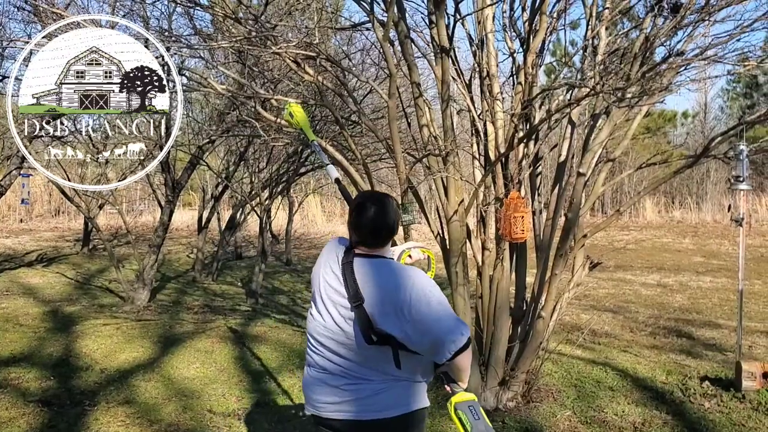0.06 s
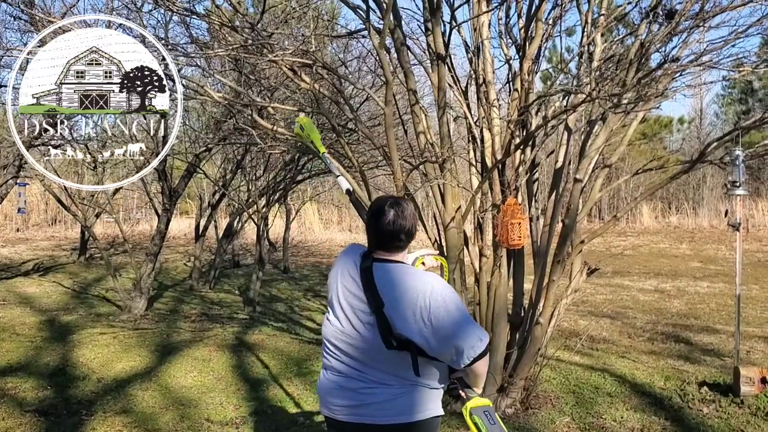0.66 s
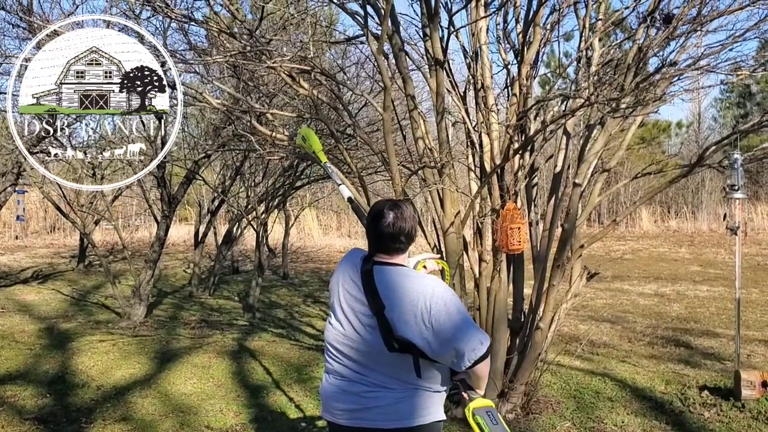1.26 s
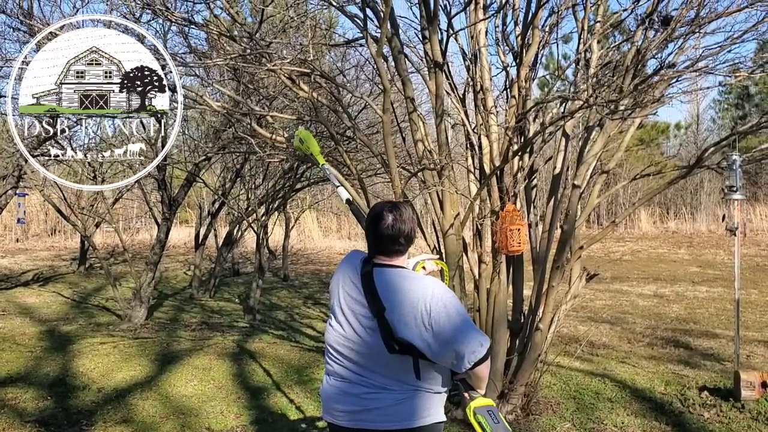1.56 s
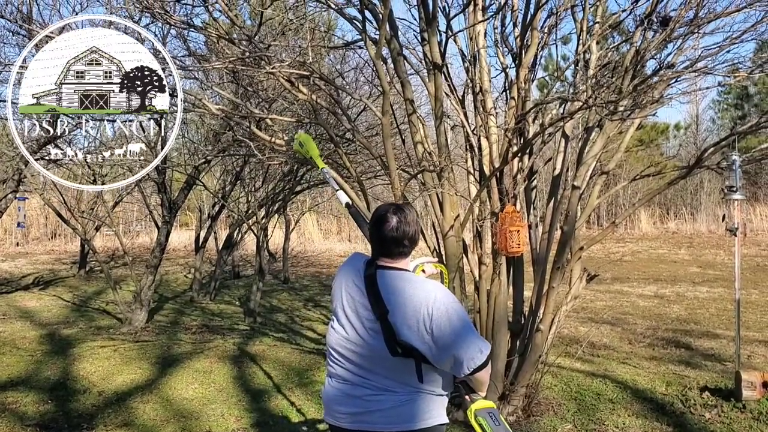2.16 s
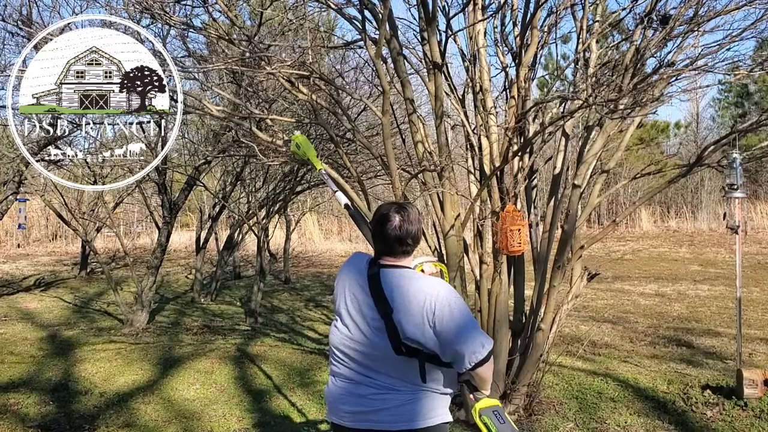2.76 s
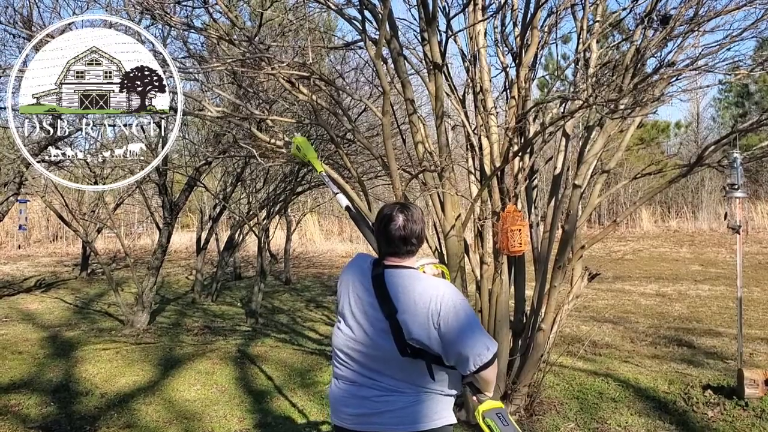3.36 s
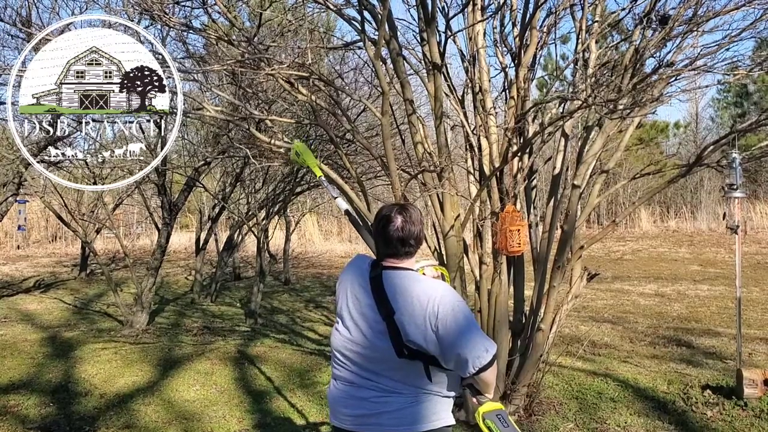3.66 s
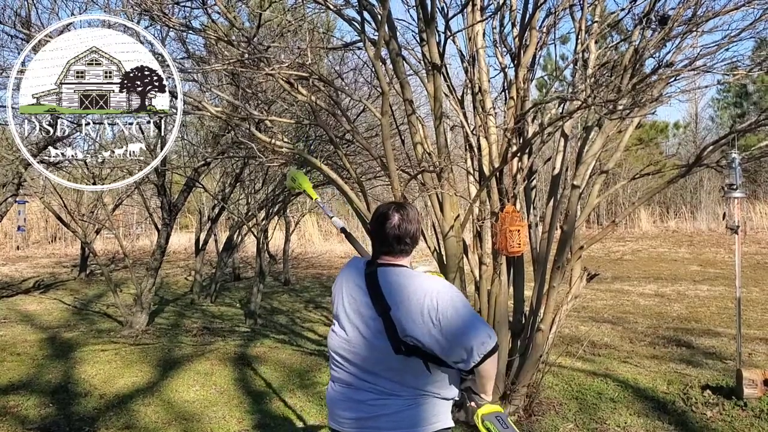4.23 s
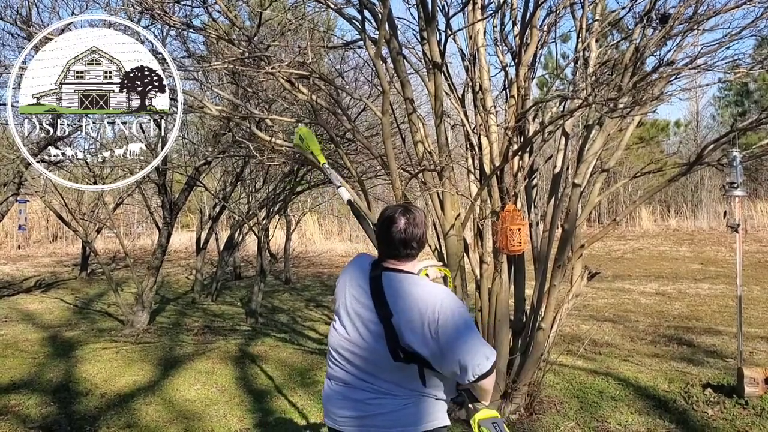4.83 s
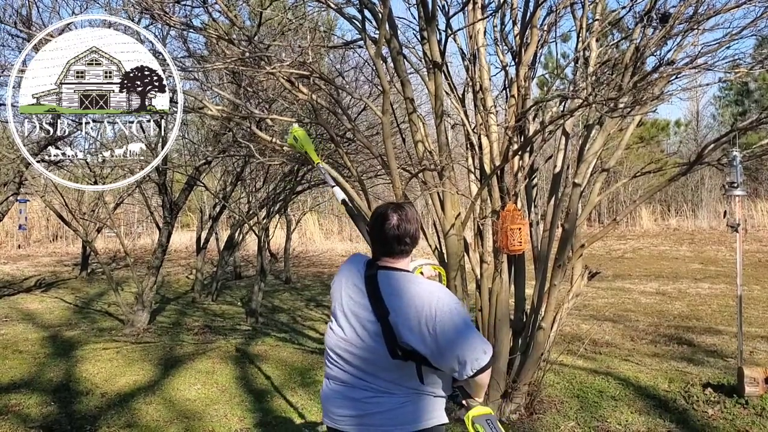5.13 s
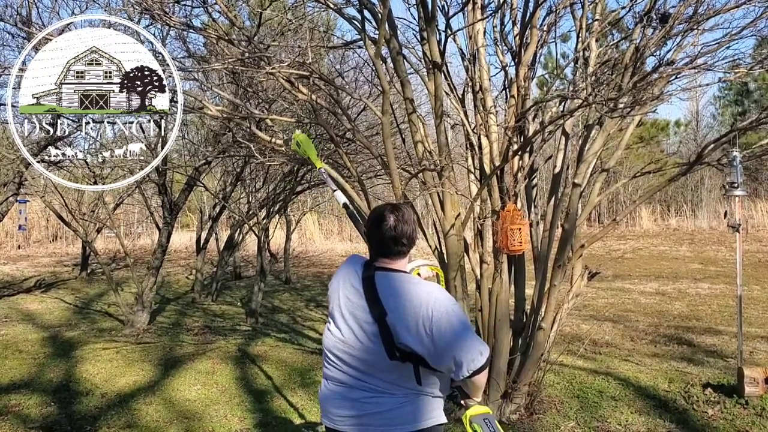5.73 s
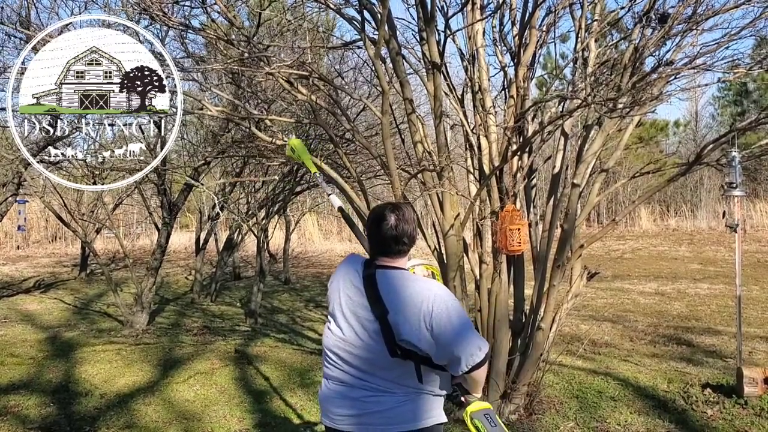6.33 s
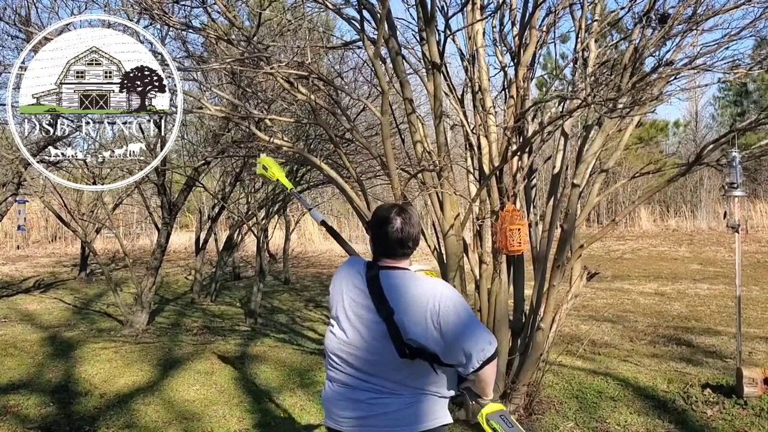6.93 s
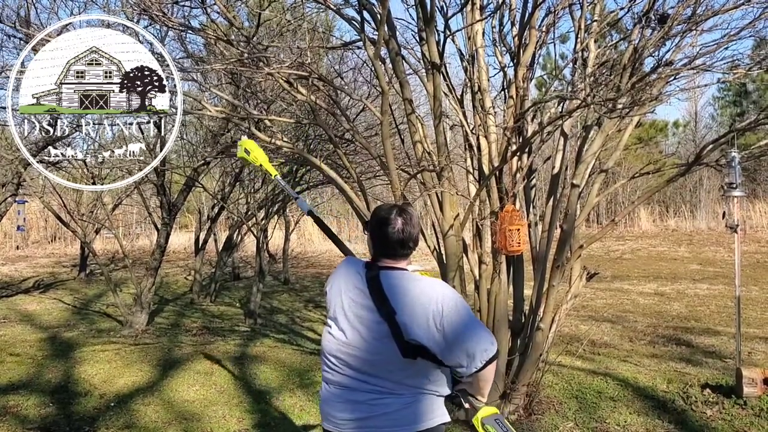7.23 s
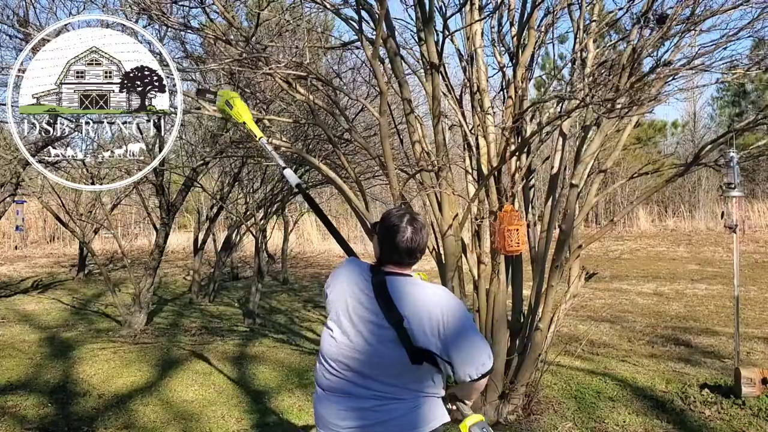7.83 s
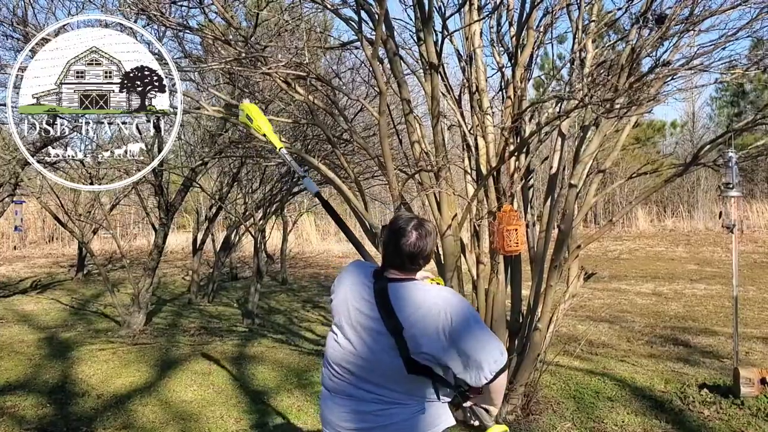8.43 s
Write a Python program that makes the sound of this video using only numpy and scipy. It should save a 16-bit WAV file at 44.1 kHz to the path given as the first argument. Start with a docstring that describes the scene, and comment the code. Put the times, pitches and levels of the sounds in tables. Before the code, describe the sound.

A battery pole saw is already running a few metres away in a garden, with a high gear whine and a rattling, hissing chain. From about 2.3 to 3.7 seconds the teeth grind harder into a branch and the pitch sags, with several wood cracks between 2.4 and 2.9 seconds. Near 4 seconds the motor starts to coast, then spins up again at 4.7. It bites again around 5.8, and the wood snaps sharply at about 6.2 seconds. From 6.5 the saw winds down, its whine falling and its rattle slowing and fading. A cut twig knocks as it drops at 6.8, followed by lighter ticks until about 8 seconds. Low puffs of wind buffet the microphone on either side throughout. A distant engine drones faintly, swelling around 5.5 seconds, and a few very faint bird calls come from 7.6 seconds on.

```python
"""In a garden, a few metres away, a battery pole saw cuts twigs: a long burst, a shorter one, a coast.
Its gear whines and drops in pitch as the wood slows the motor. The chain rattles round its metal bar,
the teeth grind, the wood cracks and a cut twig drops. Wind buffets the two microphone openings,
while far off an engine drones and birds call."""
import sys
import numpy as np
from scipy import signal
from scipy.fft import rfft, irfft, next_fast_len
from scipy.io import wavfile
from scipy.ndimage import uniform_filter1d

SR = 44100
rng = np.random.default_rng(int(sys.argv[2]) if len(sys.argv) > 2 else 0)


def dump_mix(stems):
    """Bounce the given channels to the path in sys.argv[1] as a 16-bit WAV at rate SR."""
    frames = np.atleast_2d(stems).T  # one column per channel
    limited = np.clip(frames, -1, 1)  # hard clip at full scale
    pcm = np.round(limited * 32767).astype(np.int16)
    wavfile.write(sys.argv[1], SR, pcm)


N = 374409
T = np.arange(N) / SR

# The garden's far rumble and rustle: frequency_hz, relative_db
GARDEN_SPECTRUM = [(30, -7.5), (70, 9), (150, -10.5), (400, -24), (850, -23), (1400, -23), (2200, -31.5),
                   (4500, -36), (9000, -43.5), (16000, -50)]
# How loud the far engine is: time_s, level_db
ENGINE_LEVELS = [(0, -68), (4.5, -55.5), (5.4, -40), (6.05, -43.5), (6.5, -52), (8.49, -53.5)]
# How loud the low hum is: time_s, level_db
HUM_LEVELS = [(0, -58), (.5, -44.5), (1.2, -61), (4.4, -57), (5.2, -58), (8.49, -61)]
# Bird calls: start_s, length_s, first_hz, last_hz, level_db, rasp_cycles
BIRD_CALLS = [(7.595, .085, 4700, 3450, -65, .08), (8.26, .17, 2300, 2150, -66, .3),
              (8.425, .08, 4900, 3100, -72, .05)]
# The steady breeze on the microphone: time_s, level_db
BREEZE_LEVELS = [(0, -53), (1.3, -38), (1.6, -62), (4.1, -72), (4.7, -52), (8.49, -36)]
# Puffs of wind: peak_s, half_length_s, relative_db, side_hit
WIND_GUSTS = [(0.214, 0.018, -25, "left"), (0.366, .081, -34, "left"), (0.938, 0.062, -24.5, "right"),
              (1.17, 0.07, -28.5, "right"), (1.367, 0.042, -38, "left"), (2.179, 0.026, -30, "right"),
              (3.863, .03, -32, "right"), (4.393, 0.024, -25, "left"), (4.69, 0.23, -31.5, "left"),
              (5.254, 0.11, -28.5, "left"), (5.46, 0.056, -28, "left"), (6.68, 0.071, -31.5, "right"),
              (7.3, 0.032, -28, "right"), (7.813, 0.064, -33, "left"), (7.997, 0.17, -32.5, "right"),
              (8.262, 0.014, -22, "left")]
# The deep rumble of wind: frequency_hz, relative_db
WIND_SPECTRUM = [(15, -23), (35, -6.5), (65, 4.5), (100, -4), (150, -15), (250, -32), (500, -45),
                 (1500, -82.5)]
# Wood snaps and twig knocks: peak_s, level_db, swell_s, fade_60db_s, tilt_db_per_octave, speed_lost_hz
WOOD_CRACKS = [(2.426, -21.5, .014, .06, -3, 26), (2.488, -25, .003, .06, -3, 11.6),
               (2.561, -21, .007, .09, -2, 24.8), (2.859, -23, .003, .21, 3, 14.5),
               (5.854, -27, .004, .08, -1, 11.9), (6.149, -12.5, .0005, .07, 1.2, 26.8),
               (6.229, -16.5, .004, .062, -1, 23), (6.778, -20.5, .0055, .05, 1.5, 0),
               (6.791, -25, .002, .08, 2.5, 0), (7.374, -35.5, .0005, .05, -1.5, 0),
               (7.785, -34.5, .003, .045, 1.5, 0), (7.945, -56, .0045, .2, -6, 0),
               (8.035, -53, .014, .14, -5.5, 0)]
# Tearing wood fibres: frequency_hz, relative_db
FIBRE_SPECTRUM = [(80, -24.5), (220, -1), (3000, 3), (7000, -0.5), (10000, -4.5), (16000, -8.5)]
# Teeth grinding a branch: frequency_hz, relative_db
GRIND_SPECTRUM = [(60, -43), (140, -14), (220, 7.5), (330, -4.5), (500, 0.5), (900, -7), (2000, -15.5),
                  (6000, -34)]
# When the trigger is held: start_s, end_s
TRIGGER_HELD = [(-1, 3.94), (4.667, 6.501)]
# What slows the motor: at first a light drag that eases off as the motor runs in, then the bar pressing into
# branches: start_s, length_s, first_drag_hz, last_drag_hz
MOTOR_DRAGS = [(-0.009, 1.54, 3.0, 0.59), (1.567, 0.65, 3.8, 5.12), (2.25, 0.35, 16.4, 23.9),
               (2.611, 0.29, 11.3, 10.5), (2.858, 0.179, 28.6, 22.2), (3.053, 0.498, 14.0, 8.6),
               (3.557, 0.244, 16.5, 0.4), (5.749, 0.23, 2.4, 9.1), (6.011, 0.23, 20.1, 23.7)]
# Tones of the sprocket, the wheel that drives the chain: cycles_per_turn, relative_db
SPROCKET_TONES = [(2, -9.5), (4, 1), (6, -4), (8, -20.5), (10, 1), (11, -1.5), (14, -17.5)]
# The sprocket's low tones as the chain tightens and slackens: time_s, relative_db
CHAIN_PULL = [(0.05, -48), (1.46, -46.5), (2.02, -38.5), (3.09, -48), (3.3, -29.5), (3.49, -44.5),
              (3.58, -37), (3.95, -50.5), (4.95, -51), (5.022, -44), (6.5, -48.5)]
# Chain links slapping: frequency_hz, relative_db
RATTLE_SPECTRUM = [(150, -30.5), (380, -21), (650, -11), (950, 1), (1400, -2), (2100, -0.5), (2750, -7),
                   (3300, -3), (3900, -5), (4800, -4), (6000, -11.5), (9000, -31.5)]
# Chain links sliding: frequency_hz, relative_db
HISS_SPECTRUM = [(1500, -6.5), (3500, -1), (5200, 0), (6900, 4), (7500, 0), (9000, 0), (10200, -3),
                 (12000, -1.5), (15500, -1.5)]
# Pitches at which the bar and housing ring: pitch_hz, width_hz, relative_db
BAR_RINGS = [(532, 55, 6.5), (1350, 45, 4.5), (1485, 32, 5.5), (1810, 37, -2), (1034, 62, -12),
             (2650, 55, -0.5), (2987, 56, 2), (3425, 170, -1.5), (3768, 72, 3), (4280, 68, -2)]
# The motor's weaker tones: cycles_per_turn, relative_db
MOTOR_TONES = [(4.41, -22), (5.25, -14.5), (7, -29.5), (10, -15), (15, -28)]
# The gear whine as the saw head is turned about: time_s, relative_db, left_minus_right_db
WHINE_LEVELS = [(0.0, -24.5, 19.5), (0.14, -31.5, 2.5), (0.41, -33.5, 15), (0.49, -40, -6),
                (0.77, -25, 1.0), (0.98, -27.5, -6.5), (1.17, -24.5, 3.5), (1.75, -28, 10.5),
                (1.96, -35.5, 11.5), (3.31, -28, 4.5), (3.51, -27, 16), (3.95, -26.5, 7), (4.87, -30.5, 4),
                (5.328, -40, -7), (5.514, -26.5, 2), (5.764, -25, 13.0), (5.846, -32, 5),
                (6.436, -30.5, 3.5), (6.5, -27.5, 8)]

GEAR_TEETH, WHEEL_TEETH, SPROCKET_TEETH = 14, 33, 6
FULL_SPEED_HZ = 327.3  # motor turns per second with nothing to cut


def undb(db):
    """Turn decibels into a number to multiply by."""
    return 10 ** (np.asarray(db) / 20)


def unit(x):
    """Scale a sound to an average power of 1."""
    return x / np.sqrt(np.mean(x ** 2))


def curves(table):
    """Join a table's points with straight lines in time, one curve per column."""
    times, *columns = np.transpose(table)
    return [np.interp(T, times, column) for column in columns]


def colour(x, spectrum, rings=()):
    """Shape a sound's bass and treble, add ringing peaks and scale it to power 1."""
    size = next_fast_len(N, True)
    bins_hz = np.fft.rfftfreq(size, 1 / SR) + 1
    hz, db = np.transpose(spectrum)
    shape = undb(np.interp(np.log(bins_hz), np.log(hz), db))
    peaks = 1 + sum(undb(peak) / (1 + 2j * (bins_hz - pitch) / width) for pitch, width, peak in rings)
    return unit(irfft(rfft(x, size) * peaks * shape, size)[..., :N])


def wander(rate_hz):
    """A smooth random wobble, mostly between -1 and 1."""
    step = max(int(SR / rate_hz), 1)
    points = rng.standard_normal(N // step + 2)
    joined = np.interp(np.arange(N) / step, np.arange(len(points)), points)
    return 1.45 * uniform_filter1d(joined, step // 2 + 1)


def air_noise(alike_hz):
    """Left and right noise, alike below alike_hz and unrelated above."""
    mid, side = rng.standard_normal((2, N))
    side = signal.sosfilt(signal.butter(3, alike_hz, "high", fs=SR, output="sos"), side)
    return np.array([mid + 1.17 * side, mid - 0.86 * side])


def pan(left_db):
    """Left and right gains that make the left louder by left_db."""
    gains = undb(np.array([[1], [-1]]) * left_db / 2)
    return gains / np.sqrt(np.mean(gains ** 2, axis=0))


def tone(cycles):
    """A pure tone of power 1, from a running count of cycles."""
    return np.sqrt(2) * np.sin(2 * np.pi * cycles)


def shade(x, left_db):
    """The phone's body shields one microphone opening from the treble."""
    low = signal.sosfiltfilt(signal.butter(2, 1000, fs=SR, output="sos"), x)
    return low + (x - low) * pan(left_db)


def far_background(garden_db=-51, engine_hz=114.0, hum_band_hz=(211, 241)):
    """An engine drones far off, among a wavering low hum, rumble and rustle."""
    engine_gain = undb(curves(ENGINE_LEVELS)[0] + wander(9.3))
    engine = engine_gain * tone(engine_hz * (T + 0.0014 * wander(4.4)))
    band = signal.butter(2, hum_band_hz, "band", fs=SR, output="sos")
    hum = unit(signal.sosfilt(band, rng.standard_normal(N))) * undb(curves(HUM_LEVELS)[0])
    rustle = colour(air_noise(800), GARDEN_SPECTRUM) * undb(garden_db + wander(1.2))
    return engine + hum + rustle


def birds():
    """Short calls, clear or raspy, whose pitch falls and levels out."""
    out = np.zeros(N)
    for start, length, first_hz, last_hz, db, rasp in BIRD_CALLS:
        progress = np.clip((T - start) / length, 0, 1)
        hz = last_hz + (first_hz - last_hz) * (1 - progress) ** 2
        envelope = np.sin(np.pi * np.sqrt(progress)) ** 2
        out += undb(db) * envelope * tone(np.cumsum(hz) / SR + rasp * wander(330))
    return out


def wind(buffet_db=3, gust_db=-1):
    """Swirls of air hit each microphone opening separately and make it rumble."""
    breeze = undb(curves(BREEZE_LEVELS)[0])
    sides = []
    for side in ("left", "right"):
        gusts = sum(undb(db + gust_db) * np.exp(-((T - peak) / half_length) ** 2)
                    for peak, half_length, db, side_hit in WIND_GUSTS if side_hit == side)
        rumble = colour(rng.standard_normal(N), WIND_SPECTRUM)
        sides.append(rumble * np.hypot(gusts, breeze * undb(buffet_db * wander(12))))
    return np.array(sides)


def tree_echo(x, fade_60db_s=0.44, echo_db=-18, delay_s=.012):
    """Trunks and branches scatter back a faint, short echo."""
    age = T[:SR // 2]
    echo = rng.standard_normal((2, len(age))) * np.exp(-np.log(1000) * age / fade_60db_s)
    echo *= age > delay_s
    echo /= np.sqrt(np.sum(echo ** 2) / 2)
    return undb(echo_db) * signal.fftconvolve(x, echo, axes=1)[:, :N]


def wood_cracks(roughness_db=2.0, left_db=2):
    """Each crack is a burst of tearing fibres that swells and dies away."""
    fibres = colour(air_noise(1400) * undb(roughness_db * wander(1500)), FIBRE_SPECTRUM)
    out = np.zeros((2, N))
    size = SR // 3
    octaves = np.log2((np.fft.rfftfreq(size, 1 / SR) + 200) / 4000)
    for peak, db, swell, fade, tilt_db, _ in WOOD_CRACKS:
        first = int(peak * SR) - size // 4
        part = slice(first, first + size)
        age = T[part] - peak
        envelope = np.exp(np.minimum(age / swell, -np.log(1000) * age / fade))
        burst = irfft(rfft(fibres[:, part]) * undb(tilt_db * octaves), size)  # brighter or duller
        out[:, part] += undb(db) * envelope * unit(burst)
    return out * pan(left_db)


def motor(settle_s=.062, spin_up_hz_per_s=1324, friction_hz_per_s=244.5, damping_per_s=.371,
          press_s=0.028, snag_s=.012, labour_hz=9.3):
    """The motor pulls while the trigger is held; cuts and snags slow it, and friction stops it."""
    held = 1. * sum((T >= start) & (T < end) for start, end in TRIGGER_HELD)
    drag = sum(np.interp(T, [start, start + length], [first, last], 0, 0)
               for start, length, first, last in MOTOR_DRAGS)
    drag = np.maximum(uniform_filter1d(drag, int(press_s * SR) + 1), 0)
    snags = sum(lost_hz * np.exp(-((T - peak + swell) / snag_s) ** 2)
                for peak, _, swell, _, _, lost_hz in WOOD_CRACKS) / (snag_s * np.sqrt(np.pi))
    hop = SR // 1000  # update the speed about once a millisecond
    hz, speed = FULL_SPEED_HZ - drag[0], []
    for on, sag, snag in zip(held[::hop], drag[::hop], snags[::hop]):
        driven = min(spin_up_hz_per_s, (FULL_SPEED_HZ - sag - hz) / settle_s)
        coasting = -friction_hz_per_s - damping_per_s * hz
        hz = max(hz + ((driven if on else coasting) - snag) * hop / SR, 0)
        speed.append(hz)
    speed = np.interp(T, T[::hop], speed)
    strain = uniform_filter1d(held * np.tanh((FULL_SPEED_HZ - speed) / labour_hz), SR // 20)
    return speed, drag, strain  # Hz, Hz, and effort from 0 to 1


def blows(count, scatter_db, decay, sliding):
    """A loudness curve: one fading blow at each whole count, on top of steady sliding."""
    strength = undb(scatter_db * rng.standard_normal(N // 16))[count.astype(int)]
    return unit(sliding + strength * np.exp(-(count % 1) / decay))


def cutting_teeth(links, drag, bite_db=-44, bite_drag_hz=12, grab_db=2.0):
    """Every fourth link a tooth chips the branch and shakes it; more drag makes it louder."""
    chips = blows(links / 4, scatter_db=0.0, decay=1.0, sliding=0.34)
    grind = colour(air_noise(1500) * chips, GRIND_SPECTRUM)
    return grind * (drag / bite_drag_hz) ** 0.9 * undb(bite_db + grab_db * wander(30))


def sprocket(turns, speed, low_db=-0.5, high_db=-45.5, waver_db=1.5, slack_turns=0.023):
    """The sprocket tugs the chain as it turns: a loose buzz whose low tones swell with the pull."""
    pull_db, = curves(CHAIN_PULL)
    loose_turns = turns + slack_turns * wander(30)
    buzz = np.zeros(N)
    for multiple, db in SPROCKET_TONES:
        base_db = low_db + pull_db if multiple < SPROCKET_TEETH else high_db
        buzz += undb(db + base_db + waver_db * wander(22)) * tone(multiple * loose_turns + rng.random())
    return (speed / FULL_SPEED_HZ) ** 5 * buzz


def chain(links, speed, strain, rattle_db=-28, hiss_db=-29.5, slack_db=11):
    """Links slap the bar and ring it, most clearly when slow and slack; their sliding hisses."""
    pace = np.clip(speed / FULL_SPEED_HZ, 0, 1)
    throb = undb(0.65 * tone(links / 14.5) + 0.74 * wander(16))  # the loop throbs and whips
    hits = blows(links, scatter_db=1.5, decay=0.83, sliding=1.0) * throb
    slaps = air_noise(1510) * hits
    slack_rings = [(hz, width, db + slack_db) for hz, width, db in BAR_RINGS[:4]] + BAR_RINGS[4:]
    tight = colour(slaps, RATTLE_SPECTRUM, BAR_RINGS)
    slack = colour(slaps, RATTLE_SPECTRUM, slack_rings)
    rattle = (pace * tight + (1 - pace) * slack) * pace ** 1.07 * undb(rattle_db + 2 * strain)
    hiss = colour(air_noise(1500) * hits, HISS_SPECTRUM) * pace ** 1.4 * undb(hiss_db + 0.5 * strain)
    return shade(rattle, left_db=4) + hiss * pan(left_db=1.44)


def gears(speed, turns, strain, whine_db=1, strain_db=1, flutter_db=1.6, stutter_db=4,
          overtone_db=-19.5, motor_db=-29, flicker_db=4.0):
    """Gear teeth meet in a whine that stutters as the motor slows; weaker motor tones flicker."""
    level_db, left_db = curves(WHINE_LEVELS)
    pace = speed / FULL_SPEED_HZ
    # Driven teeth stay in contact; dragged ones chatter.
    slowing = uniform_filter1d(1. * (np.gradient(speed) < 0), SR // 20)
    chatter = np.maximum(slowing, strain / 2) * np.clip(8 * (1 - pace), 0, 1)
    teeth = GEAR_TEETH * turns + (.012 + 0.094 * chatter) * wander(160)
    cycles = np.array([teeth + lead + 0.065 * wander(6) for lead in (0.095, 0)])  # left, right
    sway_db = (flutter_db + stutter_db * chatter) * np.array([wander(55), wander(55)])
    dip_db = stutter_db * chatter * (1 - strain)
    whine = tone(cycles) + undb(overtone_db) * tone(2 * cycles)
    whine *= undb(level_db + whine_db + strain_db * strain + sway_db - dip_db)
    motor_tones = np.zeros((2, N))
    for multiple, db in MOTOR_TONES:
        gain = undb(motor_db + db + flicker_db * wander(9))
        motor_tones += gain * tone(multiple * (turns + .022 * wander(70)) + rng.random((2, 1)) / 4)
    return pace ** 4.5 * (whine * pan(left_db) + motor_tones * pan(.5 * left_db))


def scene():
    """One motor speed drives gear, sprocket, chain and teeth, with the garden around them."""
    speed, drag, strain = motor()
    turns = np.cumsum(speed) / SR
    sprocket_turns = turns * GEAR_TEETH / WHEEL_TEETH
    links = sprocket_turns * SPROCKET_TEETH
    saw = gears(speed, turns, strain) + sprocket(sprocket_turns, speed) + chain(links, speed, strain)
    direct = saw + cutting_teeth(links, drag) + wood_cracks() + birds()
    return direct + tree_echo(direct) + wind() + far_background()


def record(dry, top_hz=16000):
    """The phone steeply cuts off the highest treble."""
    return signal.sosfilt(signal.ellip(10, .1, 80, top_hz, fs=SR, output="sos"), dry)


dry = scene()
out = record(dry)
dump_mix(out)
```